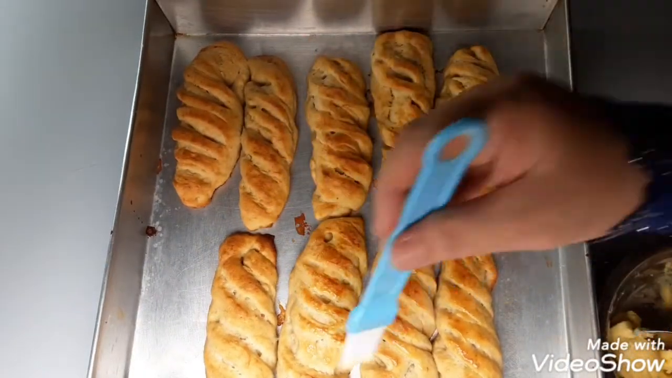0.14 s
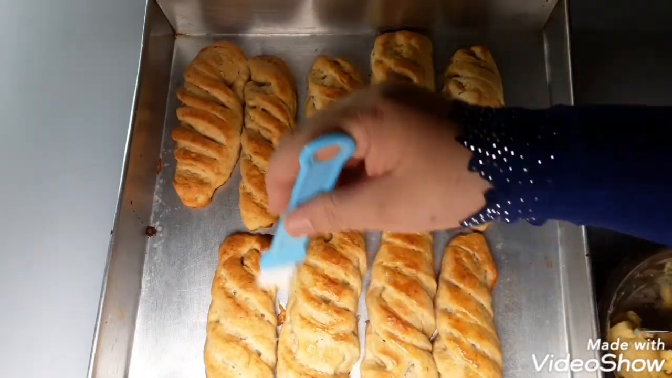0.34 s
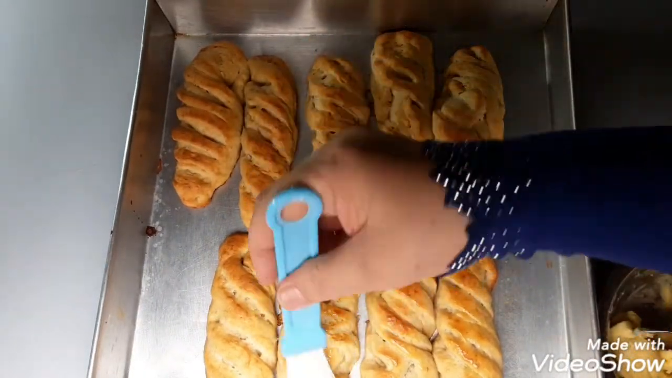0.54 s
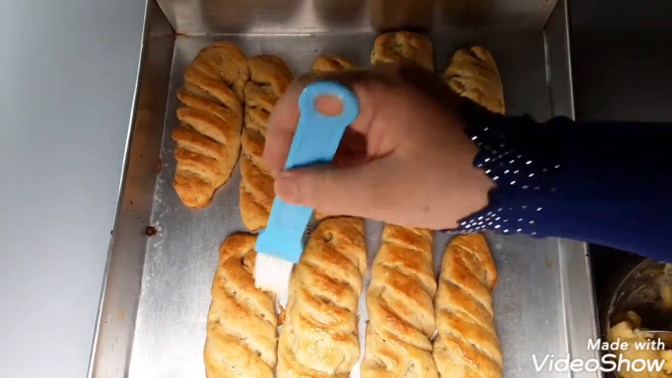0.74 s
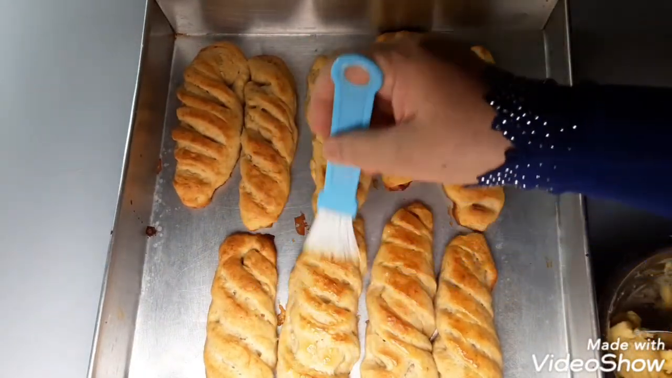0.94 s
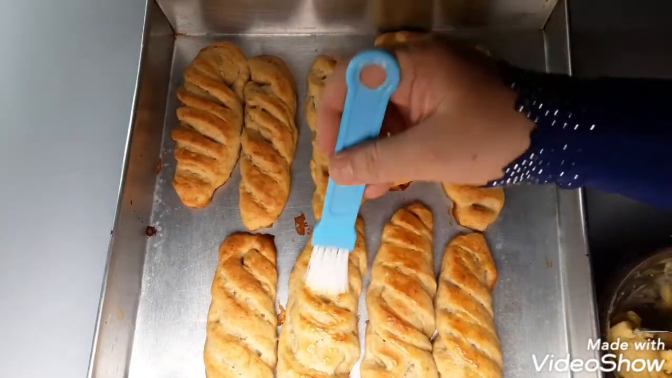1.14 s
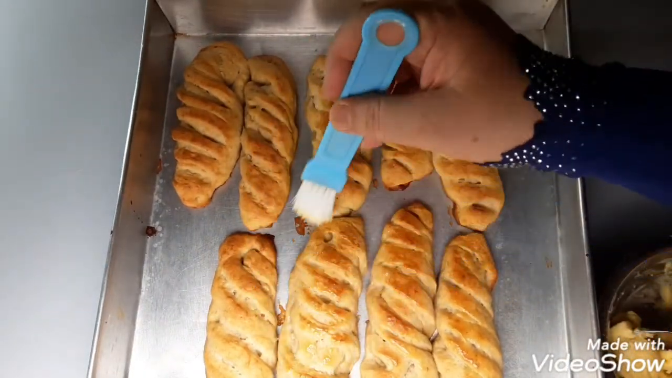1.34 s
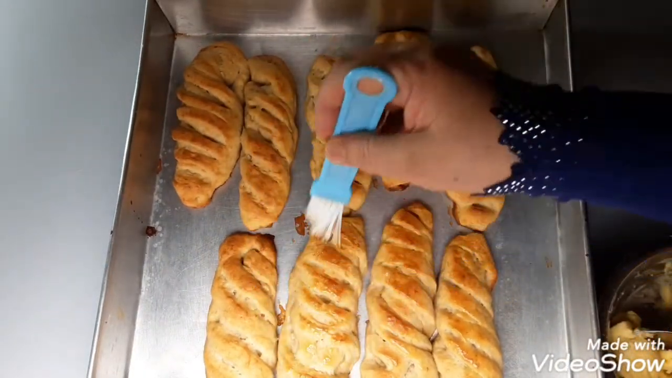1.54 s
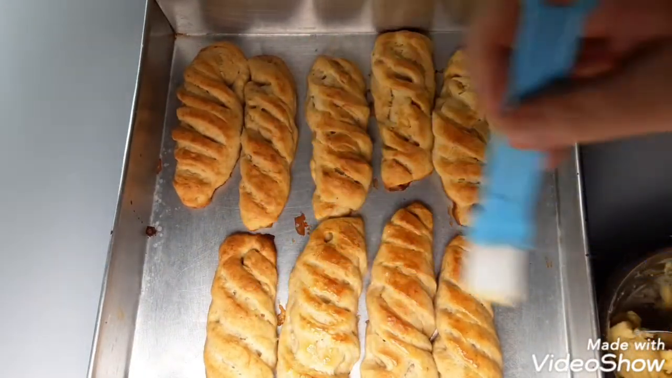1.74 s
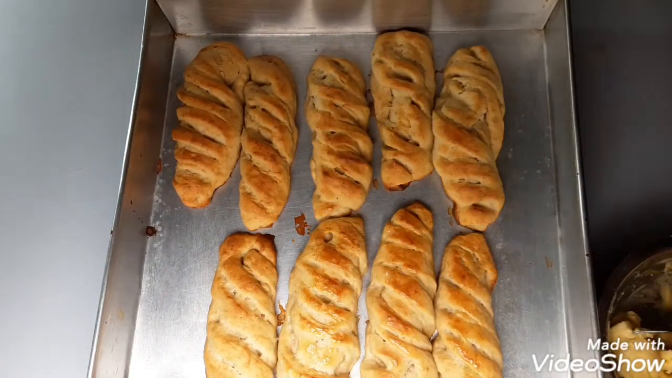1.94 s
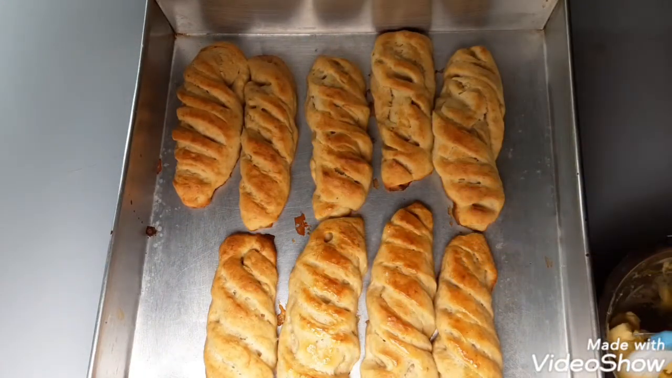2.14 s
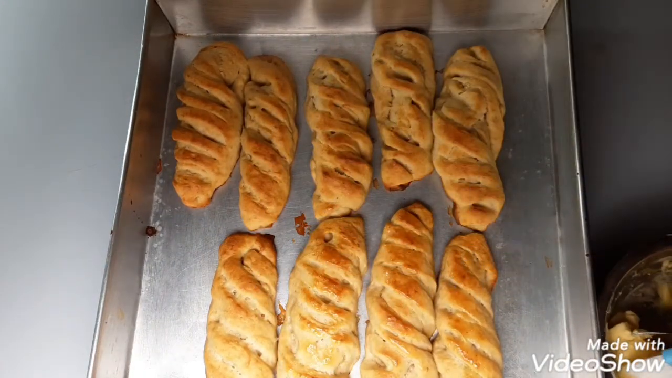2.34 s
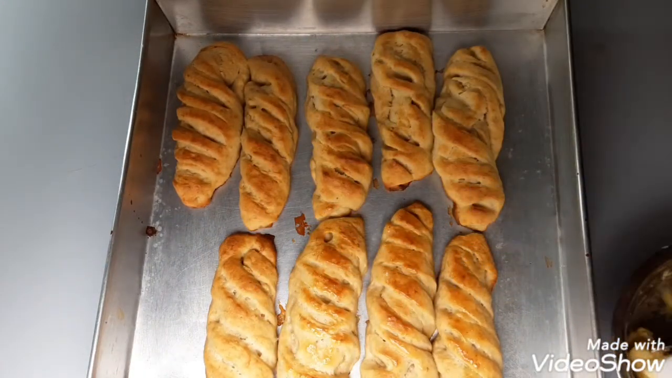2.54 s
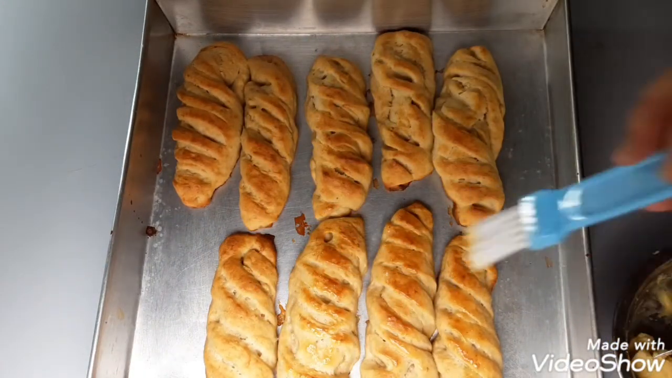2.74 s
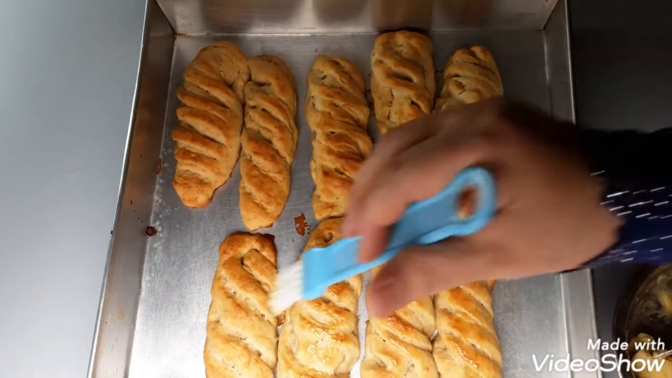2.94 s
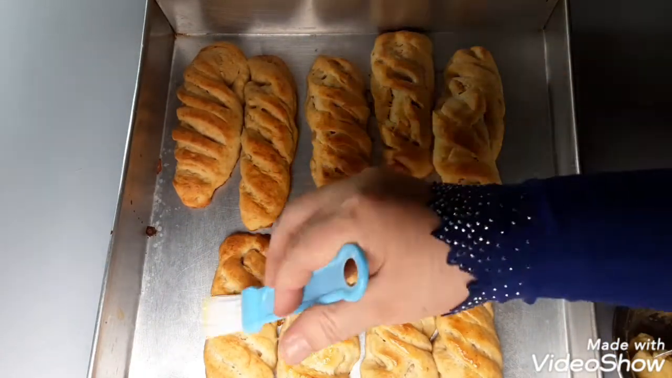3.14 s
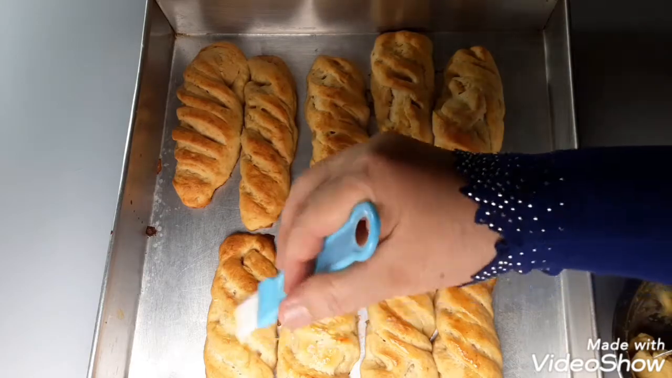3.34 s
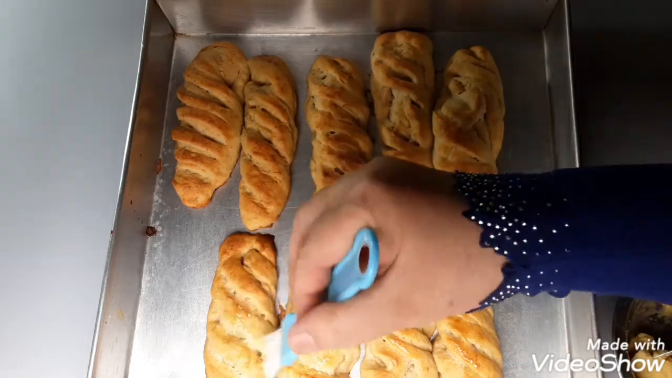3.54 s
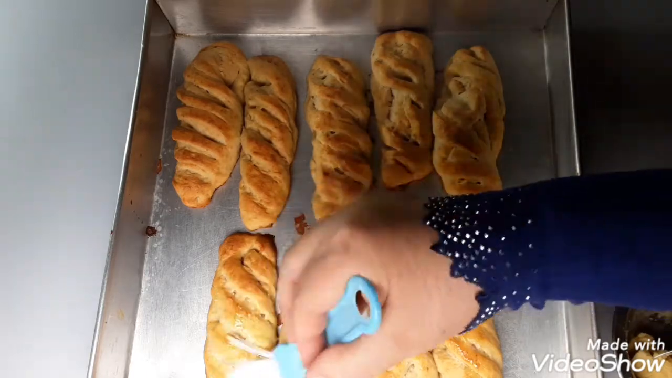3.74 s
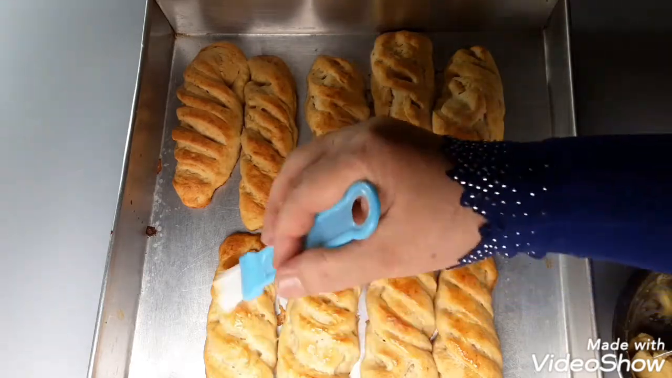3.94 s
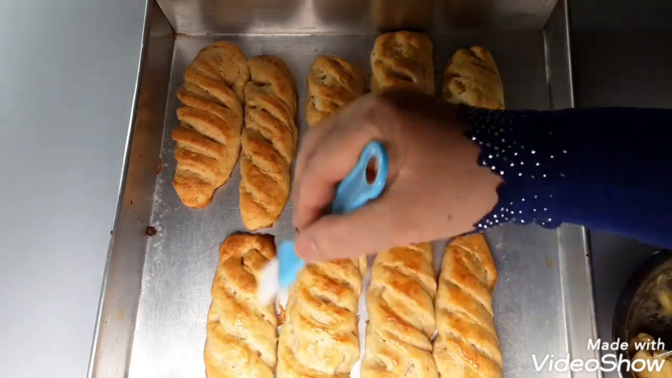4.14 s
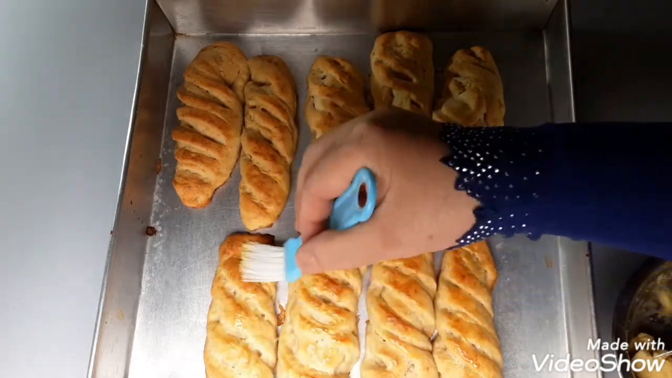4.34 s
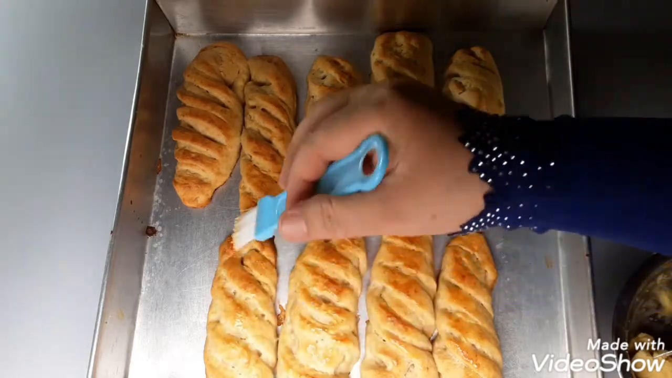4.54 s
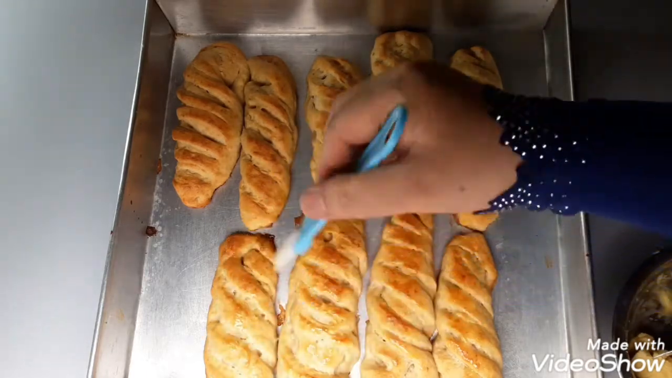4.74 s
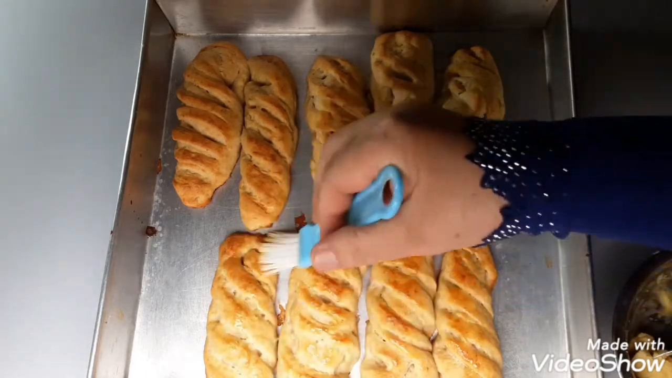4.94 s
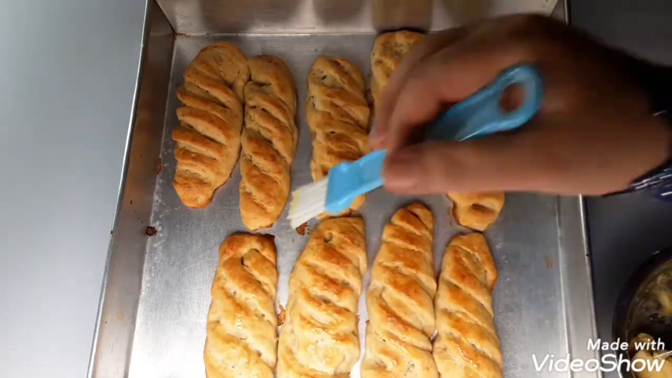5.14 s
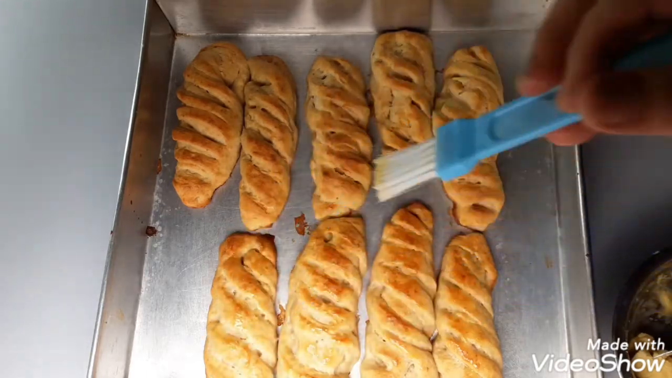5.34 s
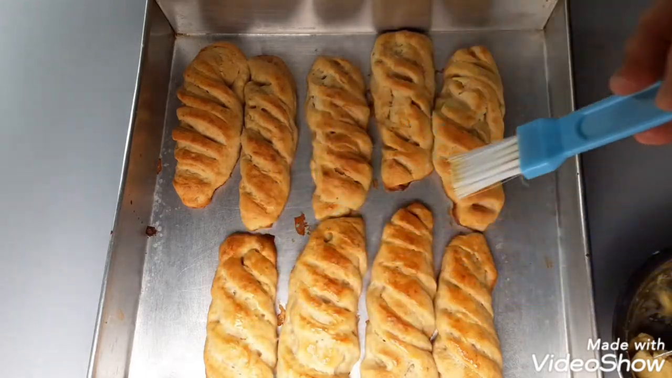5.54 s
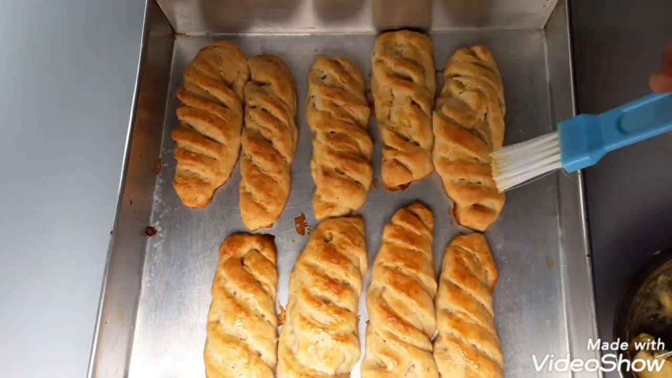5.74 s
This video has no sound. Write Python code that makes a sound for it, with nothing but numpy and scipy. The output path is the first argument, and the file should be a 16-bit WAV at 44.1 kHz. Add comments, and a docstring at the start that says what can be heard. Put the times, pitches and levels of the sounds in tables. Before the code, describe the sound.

Soft bristle strokes, crisp and slightly scratchy, come in short swells on baked crust, with dull tray knocks and low counter booms under the hand. Midway a bowl rocks, clinks and thuds loudest, then scrapes dully. Gentler dabs and drags follow until about five seconds, then mostly low room hum, faint hiss and a sleeve-like swish. Near microphones, short room reflections.

```python
"""A soft silicone brush dabs and drags over crusty buns on a steel tray: noise in three bands, roughened by slips.
The counter booms under every push (gliding sine, resonant noise); blows knock tray and cupboard (resonators).
Midway the brush is dipped in a bowl at the side, which rocks, thumps, scrapes and clinks (decaying modes, noise).
A swish, perhaps the sleeve, and the small kitchen's hum and hiss are shaped noise; the walls answer briefly."""
import sys
import numpy as np
from scipy import signal
from scipy.fft import rfft, irfft, next_fast_len
from scipy.io import wavfile
from scipy.ndimage import map_coordinates

SR = 44100
rng = np.random.default_rng(int(sys.argv[2]) if len(sys.argv) > 2 else 0)


def pcm_store(signal):
    """Save signal as 16-bit PCM."""
    levels = np.round(np.clip(np.atleast_2d(signal), -1, 1) * 32767)
    wavfile.write(sys.argv[1], SR, levels.astype(np.int16).T)


def magnitude_from_level(level_db):
    """Linear magnitude for a level in decibels (20 dB per decade)."""
    exponent = np.asarray(level_db, float) / 20
    return 10 ** exponent


N = 255620

# wide sources on the tray: f/Hz, left-right likeness/1
SPREAD = [(60, 1), (350, 0.65), (800, 0.2), (3000, 0.15), (6800, 0.069), (7500, 0.9), (14000, 0.97),
          (15500, .6)]
# thin tones of the tray sheet: f/Hz, width/Hz, level/dB
SHEET_MODES = [(980, 28, 5), (1517, 23, 5), (1954, 48, 1.5), (2580, 25, 4), (3599, 35, -4)]


def unit(x):
    """Scale to rms 1."""
    return x / np.sqrt(np.mean(x ** 2) + 1e-20)


def along(points, hz):
    """(Hz, value) points interpolated on a log frequency axis."""
    f, v = np.transpose(points)
    return np.interp(np.log(hz + 1), np.log(f + 1), v)


def curves(rows):
    """One value per sample for each column after the time."""
    s, *cols = np.transpose(rows)
    return [np.interp(np.arange(N) / SR, s, c) for c in cols]


def wobble(rate_hz, size=N):
    """Smooth random curve through rate_hz normal knots a second."""
    knots = rng.standard_normal(int(size * rate_hz / SR) + 4)
    return map_coordinates(knots, [np.arange(size) * rate_hz / SR])


def filtered(x, response):
    """x times a complex response of frequency."""
    m = next_fast_len(np.shape(x)[-1] + SR // 4)
    return irfft(rfft(x, m) * response(np.fft.rfftfreq(m, 1 / SR)), m)[..., :N]


def coloured(spectrum):
    """Zero-phase response of a (Hz, dB) spectrum."""
    return lambda hz: magnitude_from_level(along(spectrum, hz))


def resonances(modes):
    """Causal response of (Hz, width Hz, dB) second-order modes in alternating sign."""
    def response(f):
        total = 0
        for k, (centre, width, db) in enumerate(modes):
            damping = 1j * f * width
            total = total + (-1) ** k * magnitude_from_level(db) * damping / (centre * centre - f * f + damping)
        return total
    return response


def paired(noises, response, alike):
    """Two noises mixed to a stereo pair of rms 1 with a left-right likeness per frequency."""
    def mid_side(hz):
        turn = np.arccos(np.clip(along(alike, hz), -1, 1)) / 2
        return response(hz) * [np.cos(turn), np.sin(turn)]
    mid, side = filtered(noises, mid_side)
    return unit(np.array([mid + side, mid - side]))


def diffuse(spectrum):
    """Noise from all sides, its left-right likeness varying with frequency."""
    # f/Hz, left-right likeness/1
    room_alike = [(60, 0.83), (300, 0.92), (700, 0.17), (1500, 0.041), (6500, .1), (7300, 0.77),
                  (8500, 0.66), (9500, 0.32), (12000, 1), (15000, 0.87)]
    return paired(rng.standard_normal((2, N)), coloured(spectrum), room_alike)


def bursts(rows, t60_s, rise_s):
    """Envelope of (s, dB, ..) events: soft rise, exponential decay."""
    out, t = np.zeros(N + SR), np.arange(SR // 2) / SR
    for s, db, *_ in rows:
        out[round(s * SR):][:len(t)] += magnitude_from_level(db - 60 * t / t60_s) * (1 - np.exp(-t / rise_s))
    return out[:N]


def swells(rows, lingers=1, rounded=1):
    """Power of each (s, dB, swell s, fade s, ..) row on a millisecond grid; lingers stretches the fade."""
    s, db, swell_s, fade_s = np.transpose(rows)[:4, :, None]
    late_s = np.arange(N * 1000 // SR + 2) / 1000 - s
    distance = np.maximum(late_s / (fade_s * lingers), -late_s / swell_s)
    return magnitude_from_level(db - 20 * distance ** rounded) ** 2


def per_sample(rows):
    """Millisecond rows interpolated at every sample."""
    ms = np.arange(N) * 1000 / SR
    return np.array([np.interp(ms, np.arange(len(r)), r) for r in rows])


def kitchen(x):
    """Walls answer 200 samples late with decaying noise; each frequency dies at its own speed."""
    # f/Hz, t60/s
    wall_decay = [(100, 0.64), (500, .4), (3000, 0.43), (12000, 0.24)]
    hz, t, z = signal.stft(rng.standard_normal((2, SR // 2)), SR, nperseg=256)
    decay = magnitude_from_level(-60 * t / along(wall_decay, hz)[:, None])
    tail = signal.istft(z * decay, SR, nperseg=256)[1]
    delayed = np.pad(x, ((0, 0), (200, 0)))
    return signal.fftconvolve(delayed, tail / np.linalg.norm(tail[0]), axes=1)[:, :N]


def heard(x, lead_s, wet_db):
    """Source at both ports, left early by lead_s (no lead above 7300 Hz), plus its room answer."""
    def lead(hz):
        fade = np.clip((7300 - hz) / 600, 0, 1)
        return np.exp(1j * np.pi * hz * lead_s * fade * np.array([[1], [-1]]))
    return filtered(x, lead) + magnitude_from_level(wet_db) * kitchen(x)


def room():
    """Slowly wavering hum and steady hiss, both diffuse shaped noise."""
    # f/Hz, relative level/dB per Hz
    hum_spectrum = [(15, -53), (25, -7), (118, -1.5), (232, -12), (287, -5.5), (355, -2), (543, -11),
                    (592, -15.5), (886, -16.5), (1170, -22), (1510, -21.5), (3300, -43), (4000, -41),
                    (5200, -69), (8800, -120)]
    # f/Hz, relative level/dB per Hz
    hiss_spectrum = [(1470, -29), (2500, 1.5), (3600, -2.5), (4650, -6.5), (5190, -3.5), (5920, -3),
                     (7590, -6), (8200, -16), (10400, -6.5), (12800, -4), (16000, -16)]
    hum = magnitude_from_level(-47.5 + .6 * wobble(3.13)) * diffuse(hum_spectrum)
    return hum + magnitude_from_level(-66.5) * diffuse(hiss_spectrum)


def counter():
    """Shoves make the counter boom; blows knock tray and cupboard; the tray's hollow modes rumble and rattle."""
    # shoves of hand and rocking bowl: t/s, level/dB, swell over 20 dB/s, fade over 20 dB/s, f/Hz
    shoves = [(.22, -53, .3, .6, 115), (.355, -37, .05, .07, 109), (.6, -46, .6, .6, 100),
              (.95, -46, .2, 1.2, 79), (1.3, -46, .12, .25, 88), (1.5, -42, .14, .25, 112),
              (1.62, -43.5, .3, .09, 114), (2.22, -39, .045, .08, 98), (2.32, -28, .03, .06, 90),
              (2.39, -29, .11, .5, 90), (2.46, -28.5, .14, .3, 90), (2.59, -16, .05, .07, 90),
              (2.685, -25.5, .22, .065, 90), (2.8, -27, .15, .045, 90), (2.86, -36, .06, .3, 90),
              (2.95, -35, .08, .07, 90), (3.46, -47, .11, .4, 88), (3.74, -45, .07, .3, 101),
              (3.92, -47, .3, .05, 104), (4.08, -52, .22, .11, 109), (4.178, -33, .03, .07, 74),
              (4.33, -45, .11, .065, 87), (4.43, -46, .04, .06, 91), (4.54, -50, .07, .04, 113),
              (4.7, -36, .11, .09, 88), (4.76, -37, .07, .06, 95), (4.815, -35, .09, .065, 98),
              (5.07, -50, .6, .07, 95), (5.23, -49, .11, .07, 101), (5.45, -52, .3, .3, 101)]
    # hollow rumble under the working hand: t/s, level/dB
    rumble = [(0, -52), (.24, -48), (.45, -52), (.68, -41), (.85, -46), (1.22, -50), (1.3, -41), (1.4, -52),
              (1.56, -46), (1.7, -54), (2.1, -54), (2.45, -41), (2.55, -45), (2.65, -30), (2.72, -41),
              (3.0, -54), (3.35, -62), (3.54, -49), (3.66, -58), (3.78, -48), (4.1, -48), (4.25, -58),
              (4.35, -48), (4.6, -50), (4.7, -43), (4.99, -48), (5.15, -53), (5.8, -51)]
    # blows that knock tray and cupboard: t/s, relative impulse/dB, contact/ms
    thumps = [(.233, -36, 0.75), (.34, -38, 2.6), (.553, -31.5, 1.1), (1.472, -34, 0.89), (2.17, -31, 0.86),
              (2.21, -38, 2.36), (2.307, -24, 1.25), (2.32, -19, 1.3), (2.409, -31, 0.74),
              (2.423, -22, 1.2), (2.568, -19, 1.103), (2.578, -12, 0.95), (2.589, -17, 1.5),
              (2.6, -24, 1.6), (3.738, -36, 0.35), (3.744, -29.5, 0.48), (4.147, -25.5, 0.32),
              (4.15, -29, 0.47), (4.325, -38, 0.49), (4.62, -29, 1), (4.674, -27, 0.59), (5.775, -40, .4)]
    # counter modes, in the boom only: f/Hz, width/Hz, level/dB
    counter_modes = [(91.7, 25, 3), (193, 95, -6)]
    # hollow tray modes: f/Hz, width/Hz, level/dB
    tray_modes = [(255, 58.4, -4), (385, 58, -0.7), (475, 72, -2), (560.3, 66, -1.5), (642, 75, -3),
                  (854, 172, -4.5), (1123, 238, -2.5), (1950, 1020, -9)]
    # lowest mode of the cupboard below: f/Hz, width/Hz, level/dB
    cupboard_modes = [(58, 35, -12.5)]
    rest_db, rest_hz = -66, 105  # faint trembling between shoves

    power, rest = swells(shoves), magnitude_from_level(rest_db) ** 2
    total = power.sum(axis=0) + rest
    mean_hz = (np.transpose(shoves)[-1] @ power + rest_hz * rest) / total
    level, boom_hz = per_sample([np.sqrt(total), mean_hz])
    level = level + magnitude_from_level(rest_db + 3 * wobble(12))

    rattle = magnitude_from_level(-9) * bursts(thumps, t60_s=.15, rise_s=.004)  # shudder after every blow
    tray_level = np.hypot(magnitude_from_level(curves(rumble)[0] + 1.5 * wobble(11)), rattle)

    blows = np.zeros(N + SR)
    for s, db, contact_ms in thumps:
        push = np.hanning(round(contact_ms * SR / 500) + 3)  # softer contact: longer, duller
        blows[round(s * SR):][:len(push)] += magnitude_from_level(db) * push / push.sum()
    knocks = magnitude_from_level(37) * filtered(blows[:N], resonances([*cupboard_modes, *tray_modes]))

    def shake(modes):
        def response(f):
            return resonances(modes)(f) ** 2 / (1 + (f / 720) ** 6)  # soft hand drives only low modes
        return paired(rng.standard_normal((2, N)), response, SPREAD)

    swing = np.sqrt(2) * np.sin(2 * np.pi * np.cumsum(boom_hz) / SR + 0.81 * wobble(25))
    boom = level * (magnitude_from_level(-2.6) * swing + magnitude_from_level(-6.5) * shake(counter_modes))
    hollow = magnitude_from_level(-3.5) * tray_level * shake(tray_modes)
    return boom + heard(hollow + knocks, lead_s=0.00017, wet_db=-10.5)


def brush():
    """Dabs puff and drags swell (one is the bowl's scrape); fizz, rasp and dull scuff share the pressure."""
    # bristle tips landing: t/s, relative level/dB, dullness/dB
    dabs = [(0.231, -32.5, 3), (0.55, -38, 6), (0.8395, -38, .3), (1.1565, -35, -1.5), (1.178, -37, -5),
            (1.4703, -34, -1.5), (2.1166, -49, .3), (2.1695, -42, -3), (2.3188, -38, 1.5),
            (3.1148, -49, 1.5), (3.4441, -46, .3), (3.735, -38, 3), (4.0187, -39, .3), (4.145, -32, .3),
            (4.3241, -37, 7), (4.3628, -39, .3), (4.6179, -42.5, 6), (4.6732, -32, 1.5), (4.7011, -39, .3),
            (4.9422, -40, .3), (5.7748, -51, 7)]
    # drags on crust, and at 2.9 s a dull scrape as the bowl rocks:
    # t of most pressure/s, fizz level/dB, swell over 20 dB/s, fizz fade over 20 dB/s,
    # dullness (scuff over fizz, before layer gains)/dB
    drags = [(.348, -40, .052, .04, -13), (.645, -40.5, .065, .075, -6), (.75, -63, .09, .14, 10),
             (.87, -56, .03, .09, -1), (.972, -41, .085, .065, -10), (1.2, -48, .025, .07, -9),
             (1.256, -42.5, .08, .09, -8), (1.32, -57, .06, .11, 7), (1.49, -54, .025, .06, -4),
             (1.535, -41.5, .045, .085, -8), (2.13, -61, .04, .15, -4), (2.254, -59, .05, .035, -5),
             (2.32, -47, .014, .017, -3), (2.345, -57, .021, .021, 10), (2.47, -55.5, .03, .12, 1.5),
             (2.582, -51, .03, .04, 7), (2.9, -74, .35, .11, 15), (3.131, -60.5, .03, .065, 5),
             (3.255, -53, .09, .09, -3), (3.488, -50, .085, .11, -4), (3.572, -47, .06, .05, -7),
             (3.745, -55, .012, .09, 6), (3.8, -47.5, .08, .075, -3), (3.87, -61, .09, .06, 2.5),
             (4.08, -52, .055, .07, -7), (4.142, -45, .075, .016, -6), (4.375, -49.5, .025, .065, -3),
             (4.45, -46, .09, .04, -4), (4.66, -52, .06, .04, -1), (4.712, -43, .03, .07, -4),
             (4.81, -66, .06, .11, 7), (4.97, -56, .04, .08, 2.5), (5.013, -43, .04, .032, -4)]
    # bright layer: f/Hz, relative level/dB per Hz
    fizz_spectrum = [(7000, -26), (8000, -6.5), (8600, -8), (10000, -5), (12500, 0), (15000, -5.5),
                     (15800, -1), (16300, -44)]
    # middle layer: f/Hz, relative level/dB per Hz
    rasp_spectrum = [(2800, -9), (3800, -5.5), (5300, -5.5), (6100, 1), (6800, -2), (7600, -6), (8600, -32)]
    # dull layer: f/Hz, relative level/dB per Hz
    scuff_spectrum = [(410, -35), (700, 4), (763, -7.5), (1130, -5), (1260, -7.5), (1960, -3.5), (2300, -5),
                      (4500, -11.5), (5850, -6), (9900, -120)]
    rasp_db, rasp_follows = 1.5, .45  # rasp over fizz, before layer gains; share of dullness it takes

    dull_db = np.transpose(drags)[-1]
    layers = [(0 * dull_db, 1), (rasp_db + rasp_follows * dull_db, 1.1), (dull_db, 1.4)]  # dB, fade stretch
    drag = per_sample([np.sqrt(magnitude_from_level(db) ** 2 @ swells(drags, lingers, rounded=1.3))
                       for db, lingers in layers])
    puffs = [bursts([(s, db + share * dull) for s, db, dull in dabs], t60_s=.095, rise_s=0.0013)
             for share in (0, rasp_follows, 1)]
    fizz, rasp, scuff = np.hypot(drag, magnitude_from_level([[-14], [-10], [-10]]) * puffs)

    grain = magnitude_from_level(1.3 * wobble(900) + 1.6 * wobble(45))  # bristle tips slip singly and in clumps

    def slips(response):
        rough = grain * magnitude_from_level(1.2 * wobble(50)) * rng.standard_normal((2, N))
        return paired(rough, response, SPREAD)

    def scuff_on_sheet(hz):
        return coloured(scuff_spectrum)(hz) * np.hypot(1, abs(resonances(SHEET_MODES)(hz)))

    bright = fizz * slips(coloured(fizz_spectrum))
    middle = magnitude_from_level(0.5) * rasp * slips(coloured(rasp_spectrum))
    dull = magnitude_from_level(2) * scuff * slips(scuff_on_sheet)
    return bright + middle + dull


def swish():
    """Soft swish, perhaps the sleeve; near 2.75 s the noisy tail of the bowl's clink: diffuse shaped noise."""
    # t/s, level/dB
    swish_level = [(0, -75), (.4, -73), (.52, -63), (.8, -60), (1.05, -74), (1.4, -66), (1.6, -73),
                   (1.95, -64), (2.3, -67), (2.75, -53), (2.97, -61), (3.03, -74), (3.7, -74), (4.3, -75),
                   (4.8, -64), (5.2, -74), (5.6, -60), (5.8, -74)]
    # f/Hz, relative level/dB per Hz
    swish_spectrum = [(2500, -14), (4300, -4.5), (5300, -1), (6200, -0.5), (7500, -10), (9000, -18.5),
                      (11000, -14.5), (13000, -7.5), (15800, -15), (16300, -50)]
    return magnitude_from_level(curves(swish_level)[0] + 0.81 * wobble(14)) * diffuse(swish_spectrum)


def sheet():
    """Brush touches on the bare sheet ring its thin tones: impulses through resonators."""
    # t/s, impulse/dB
    tinks = [(1.292, -4), (1.315, -4), (1.338, -4)]
    touch = np.zeros(N)
    for s, db in tinks:
        touch[round(s * SR)] = magnitude_from_level(db)
    return filtered(touch, resonances(SHEET_MODES))


def bowl():
    """Clinks: a short crack, main modes and a crowd of weak modes, all with slightly unsteady pitch."""
    # handle on bowl: t/s, relative level/dB, share of free ring time left by the grip/1,
    # sharpness (shelf, full above 8800 Hz)/dB
    clinks = [(2.3497, -19, 0.33, -6.5), (2.4145, -32.5, .15, -0.5), (2.4188, -17.5, 0.18, -4),
              (2.613, -5.5, 0.68, -0.5)]
    # main modes: f/Hz, relative level/dB, free t60/s
    main_modes = [(1505, -4, 0.1), (2208, -10, 0.12), (2340, 3, 0.085), (2972, -12, 0.38),
                  (3729, -4.5, 0.36), (3762, 0.4, 0.47), (3801, -5.5, 0.35), (3900, -14, .3),
                  (4480, -20, 0.24), (4870, -14, 0.34), (6024, -18, .35), (6430, -10, 0.27),
                  (6740, -14, .3), (6660, -7, 0.29), (6915, -4.5, 0.39), (7080, -6, .32), (7880, -7, 0.26),
                  (9300, -13, 0.43), (11600, -7, .22), (13200, -15, 0.2)]
    # clink attack: f/Hz, relative level/dB per Hz
    crack_spectrum = [(600, -63), (1200, -10.5), (2300, -3), (3200, -9), (3800, -5), (5000, -13.5),
                      (7000, -3), (8500, -7), (10000, -11.5), (13000, -5), (16000, -20), (17000, -54)]

    rings, cracks = np.zeros((2, N + SR)), np.zeros((2, N + SR))
    t = np.arange(SR * 3 // 8) / SR
    crowd_hz = rng.uniform(1300, 15000, size=72)
    crowd_db = along(crack_spectrum, crowd_hz) - 11.5 + rng.normal(0, 2.1, size=72)
    crowd_t60_s = .42 * (crowd_hz / 3000) ** -.3
    modes = [*main_modes, *np.transpose([crowd_hz, crowd_db, crowd_t60_s])]
    hz, level_db, t60_s = np.transpose(modes)
    noise = paired(rng.standard_normal((2, N)), coloured(crack_spectrum), [(1000, 0.17)])
    swings = np.exp(1j * np.array([2 * np.pi * f * t + 0.8 * wobble(50, size=len(t)) for f in hz]))

    for s, db, free, sharp_db in clinks:
        start = round(s * SR)
        strike_db = level_db + rng.normal(0, 1.8, size=(2, len(hz)))
        struck = magnitude_from_level(strike_db) * np.exp(1j * rng.normal(0, 0.6, size=(2, len(hz))))
        decay = np.exp(-np.log(1000) * t / (free * t60_s[:, None]))
        ring = (struck @ (swings * decay)).imag
        snap = magnitude_from_level(db - 4.5 - 60 * t / 0.023) + magnitude_from_level(db - 33 - 60 * t / (0.69 * free))
        crack = snap * (1 - np.exp(-t / .0004)) * noise[:, start:][:, :len(t)]
        shelf = coloured([(7600, 0), (8800, sharp_db)])
        rings[:, start:][:, :len(t)] += magnitude_from_level(db - 25.5) * filtered(ring, shelf)[:, :len(t)]
        cracks[:, start:][:, :len(t)] += filtered(crack, shelf)[:, :len(t)]
    ringing = heard(rings[:, :N], lead_s=0, wet_db=-4)
    return ringing + heard(cracks[:, :N], lead_s=-0.00019, wet_db=-8.5)


def scene():
    """Brush, tray, bowl, counter and swish over the room's hum and hiss."""
    on_tray = heard(brush() + sheet(), lead_s=.00018, wet_db=-10.5)
    return on_tray + bowl() + counter() + swish() + room()


def top_cut(x):
    """Nothing passes above the cut-off."""
    return signal.sosfilt(signal.butter(12, 17150, fs=SR, output="sos"), x)


def record(dry):
    """Two microphone ports differ in colour and pass little deep bass."""
    # f/Hz, left minus right/dB
    port_lean = [(60, -2), (400, -1.5), (1200, -3), (3000, -4), (5000, -4.5), (6100, -9), (7200, 2),
                 (8300, 1.5), (10000, -7), (13000, -3), (16000, 4.5)]

    def port_response(hz):
        lean_db = along(port_lean, hz) / 2 * np.array([[1], [-1]])
        return magnitude_from_level(lean_db) / (1 + (42 / (hz + 1)) ** 4)

    ports = filtered(dry, port_response)
    return top_cut(ports)


dry = scene()
out = record(dry)
pcm_store(out)
```